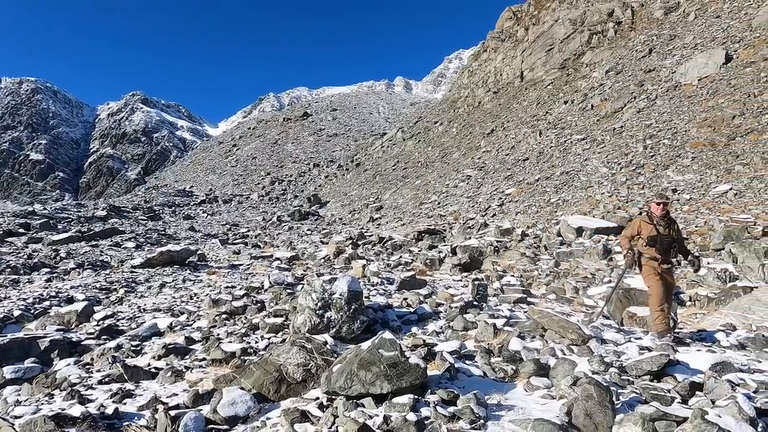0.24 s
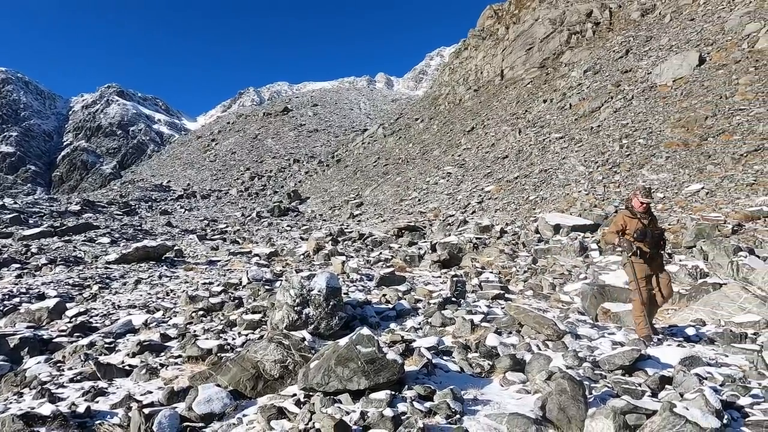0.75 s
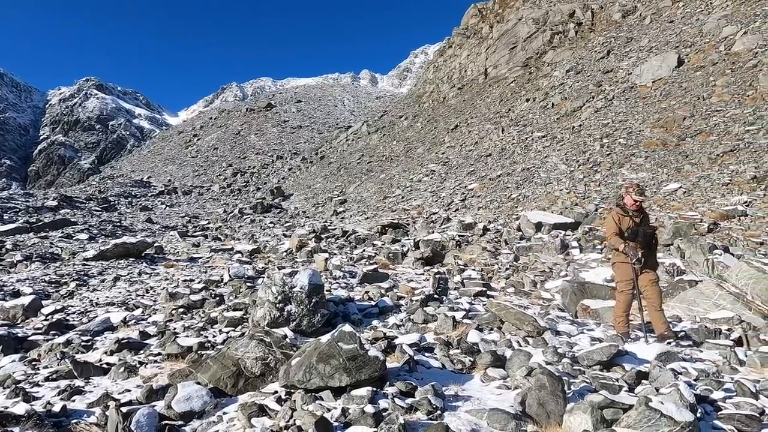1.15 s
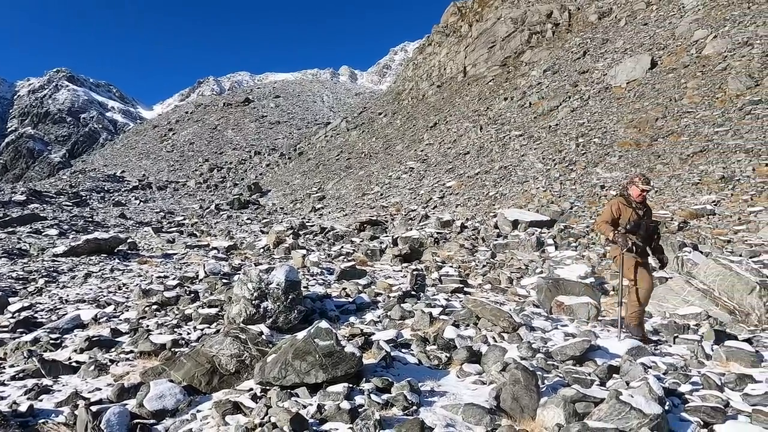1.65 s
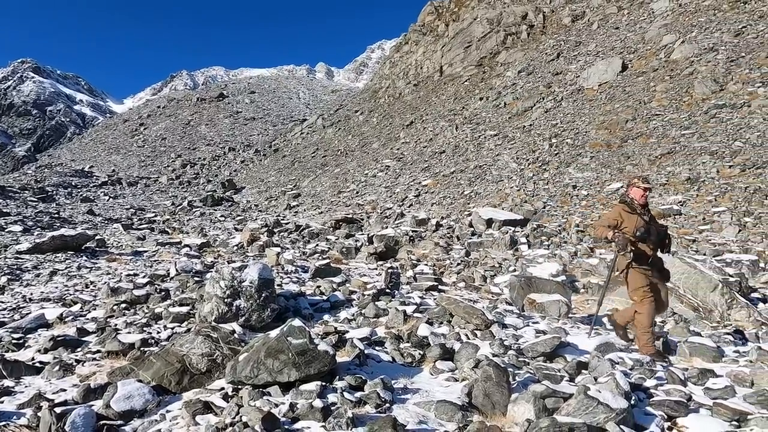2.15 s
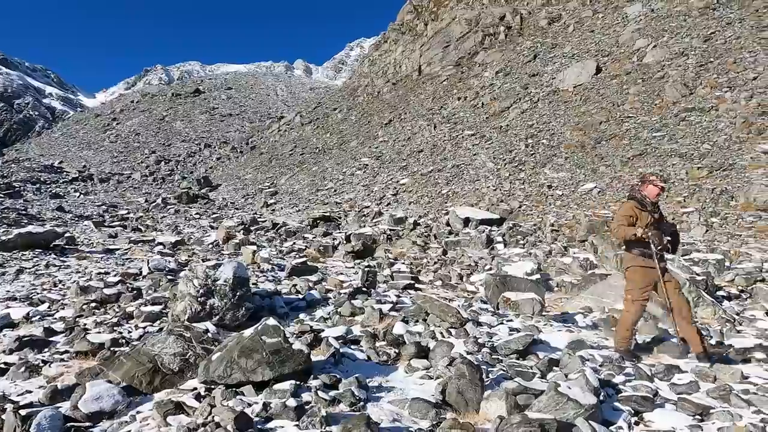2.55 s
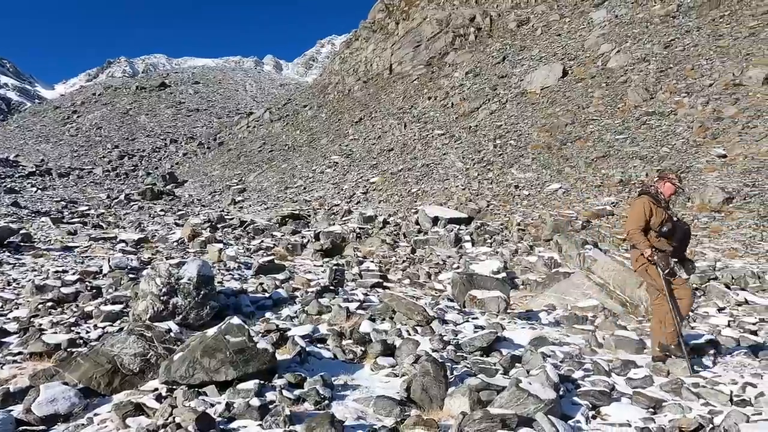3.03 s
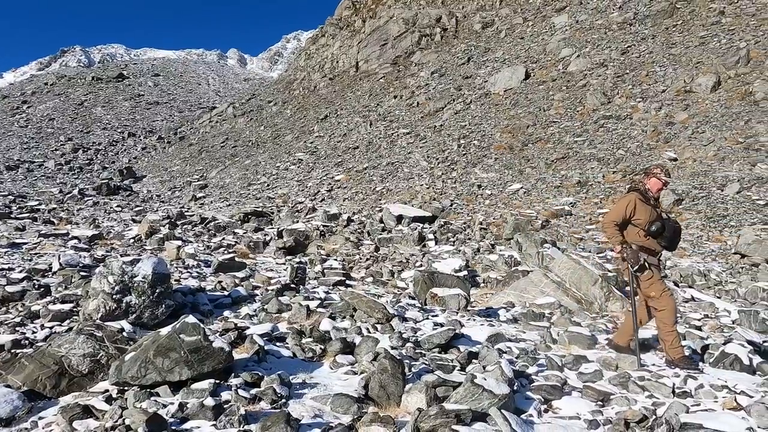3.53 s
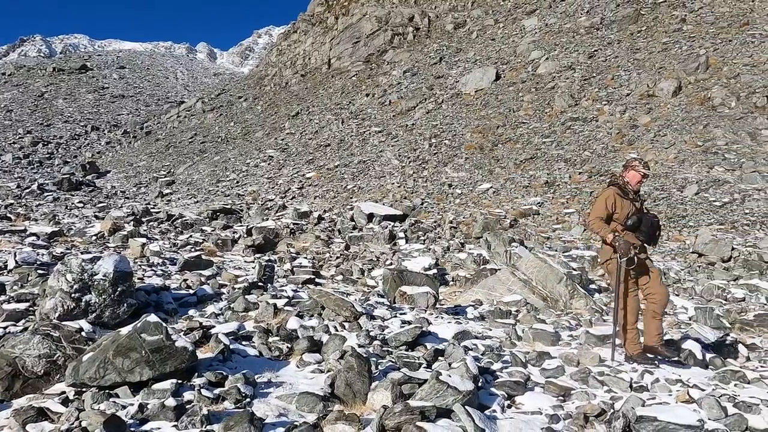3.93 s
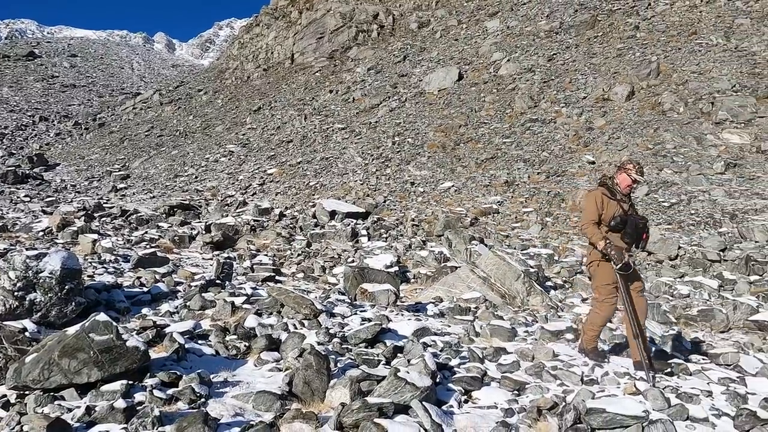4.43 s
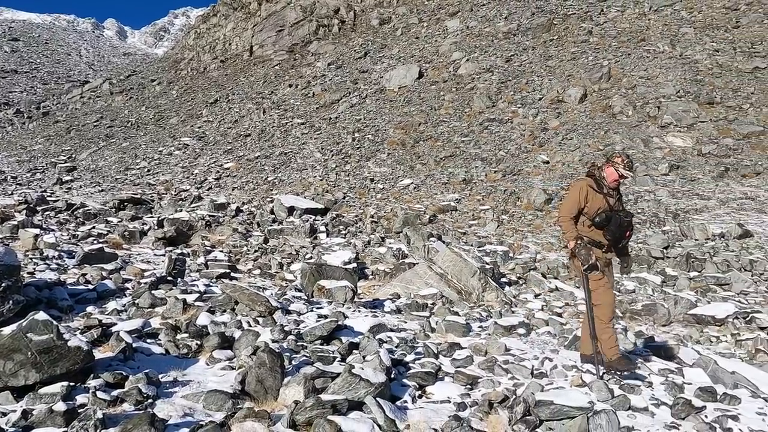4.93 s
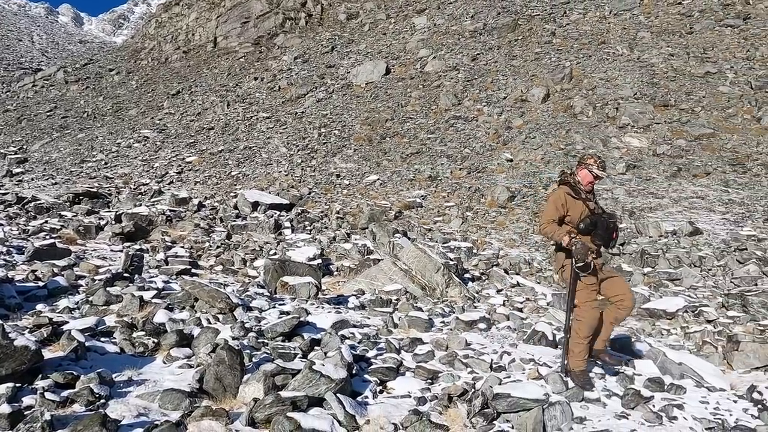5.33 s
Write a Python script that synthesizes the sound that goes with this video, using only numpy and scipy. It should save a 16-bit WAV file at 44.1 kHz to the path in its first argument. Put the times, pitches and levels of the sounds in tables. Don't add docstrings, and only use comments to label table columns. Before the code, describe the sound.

Outdoors on a rocky mountain slope, a hiker some metres away shifts loose stones. A sharp double clack comes first, then a lighter gravelly clatter, a small block-like knock and tiny ticks, and finally a bright ringing slab knock. Quiet gaps hold faint airy hiss, while low wind heaves unevenly against the camera microphone.

```python
import sys
import numpy as np
from scipy import signal
from scipy.fft import rfft, irfft
from scipy.io import wavfile
from scipy.ndimage import uniform_filter1d

SR = 44100
rng = np.random.default_rng(int(sys.argv[2]) if len(sys.argv) > 2 else 0)


def wrap_up_sound(samples):
    columns = np.atleast_2d(samples).T
    tamed = np.clip(columns, -1, 1)
    steps = np.round(tamed * 32767).astype(np.int16)
    wavfile.write(sys.argv[1], SR, steps)


def boost_factor(decibels):
    exponent = np.asarray(decibels, float) / 20
    return 10 ** exponent


N = 246078

# f/Hz, width/Hz, level/dB
SLAB = [(1027, 82, 0.5), (1330, 120, 4.5), (2020, 140, -0.5), (3580, 300, -11), (4020, 280, -11),
        (5720, 340, -16), (6830, 290, -14.5), (8060, 140, -34), (12000, 240, -27), (12900, 290, -33),
        (13700, 280, -24)]
WEDGE = [(1500, 140, -1), (2630, 140, 4.5), (3350, 150, -0.5), (3730, 160, 3), (5200, 210, -5.5),
         (6300, 180, -3.5), (7300, 180, -21), (9850, 440, -25), (12200, 540, -22), (15300, 480, -26)]
SLAB_FACE = [(1250, 77, -1.5), (1590, 88, 6), (2450, 130, 1), (3450, 150, -10), (4500, 77, -21),
             (5530, 120, -8), (6420, 120, -14), (8320, 120, -11), (10000, 140, -26), (13700, 94, -22)]
WEDGE_FACE = [(1290, 60, -2), (1650, 60, 2), (2450, 65, 1), (3740, 71, -1.5), (5220, 70, -10),
              (5300, 60, -12), (6960, 120, -8), (8200, 80, -20), (9600, 52, -28), (11900, 43, -23)]
PLATE_FACE = [(1340, 24, 4), (1580, 75, 0), (1800, 96, -2), (2500, 86, -5), (3340, 90, -5), (5380, 17, -2),
              (6200, 40, -10), (7700, 80, -13), (8400, 90, -11), (13500, 32, -19)]
SHARD = [(1330, 240, -4), (2530, 110, 5), (3980, 280, -4), (6960, 300, -10), (7600, 300, -11),
         (8900, 180, -17), (9900, 170, -11), (11500, 230, -25), (14000, 340, -35)]
SHARD_FOOT = [(1380, 400, 0), (2660, 330, -6), (4820, 200, -16), (6850, 210, -17), (8200, 340, -13),
              (11800, 580, -23)]
GRAVEL = [(670, 200, -8), (1560, 290, -5), (2370, 160, -1), (3320, 130, 0), (3650, 130, -1),
          (4310, 130, -4), (4750, 160, -6), (5320, 70, 7), (6830, 150, -8), (8130, 160, -7.5),
          (8700, 120, -14), (10200, 150, -15), (13700, 200, -26)]
SHARDS = [(1380, 130, 3), (1970, 130, 2), (3400, 150, 4), (3880, 120, 2), (5400, 170, -3), (6940, 220, -7),
          (7300, 120, -7), (8700, 150, -4), (11200, 550, -11), (12300, 110, -15), (14100, 350, -20)]
PEBBLE = [(1635, 260, -12.5), (2920, 65, 1), (3450, 290, -6.5), (4000, 450, -14), (5250, 270, -19),
          (7680, 90, -13.5), (8720, 150, -21), (14900, 500, -37)]
BLOCK = [(417, 150, -4), (910, 100, 1.5), (1570, 98, 0), (2550, 130, -0.5), (3506, 86, 3.5), (3900, 90, -6),
         (5280, 140, -3), (6450, 110, -5), (7150, 150, -7), (7910, 120, -7.5), (8300, 130, -14),
         (11900, 250, -19), (13700, 200, -29)]
CHIP = [(3420, 100, 2), (4040, 350, 0), (5430, 160, -4), (6650, 250, -7), (9900, 300, -13),
        (11600, 280, -16), (14800, 900, -17)]
PLATE = [(900, 150, -3), (1170, 90, 2), (1556, 200, 6), (1780, 97, 4), (2140, 100, 2), (3080, 85, -15),
         (3890, 210, -4), (5000, 89, -10), (6130, 800, -4.5), (7960, 260, -7), (8800, 260, -21),
         (10300, 65, -38), (11900, 79, -33), (13500, 78, -34)]
COBBLE = [(620, 300, -9), (800, 300, -6), (960, 200, -4), (1580, 89, -1), (2380, 290, -4), (3750, 240, -6),
          (4530, 200, -16), (5460, 45, -2), (6270, 150, -7), (7320, 110, -7), (8500, 200, -15),
          (9700, 250, -15.5), (11800, 200, -21), (13700, 300, -24)]
SPLINTER = [(3000, 300, -4), (5800, 300, -6), (9600, 150, 0), (11900, 150, 0), (15200, 250, -8)]
FLAKE = [(1620, 160, 0), (2500, 150, -3), (3620, 160, -3), (5320, 150, -7), (6950, 130, -6),
         (8300, 200, -16), (15400, 120, -20)]


def evened(x):
    return x / np.sqrt(np.mean(x ** 2) + 1e-20)


def read(points, hz):
    f, value = np.transpose(points)
    return np.interp(np.log(hz + 0.045), np.log(f + 0.092), value)


def coloured(x, points):
    gain = boost_factor(read(points, np.fft.rfftfreq(len(x), 1 / SR)))
    return irfft(rfft(x) * gain, len(x))


def add(mix, s, sound):
    part = mix[round(s * SR):][:len(sound)]
    part += sound[:len(part)]


def wash():
    # f/Hz, level/dB per Hz
    valley_colour = [(60, -6), (110, -5), (200, -4.5), (270, -9), (340, -3.5), (480, -5.5), (700, -7.5),
                     (1600, -12.5), (3500, -19), (6300, -22), (8000, -27), (10300, -27.5), (12500, -31),
                     (15600, -39.5)]
    # t/s, level/dB
    swell = [(0, .6), (.9, -2.1), (2.6, -1.7), (4.2, .2), (5.58, 2.6)]
    wash_db = -53.7
    swell_share = [(900, .06), (5000, 0.9), (10000, 1.3)]  # f/Hz, dB per dB of swell
    frames, hz = N // 256 + 5, np.fft.rfftfreq(1024, 1 / SR)
    real, imaginary, patches = rng.standard_normal((frames, 513, 3)).T
    patches = evened(uniform_filter1d(uniform_filter1d(patches, 10, 0), 12, 1))
    air_db = np.interp(np.arange(frames) * 256 / SR, *np.transpose(swell))
    swell_db = read(swell_share, hz)[:, None] * air_db
    z = (real + 1j * imaginary) * boost_factor(read(valley_colour, hz)[:, None] + 0.4 * patches)
    scale = np.sqrt(np.mean(abs(z) ** 2) * len(hz))
    noise = signal.istft(z * boost_factor(swell_db) / scale, nperseg=1024, noverlap=768)[1][:N]
    return boost_factor(wash_db + 6) * noise


def gusts(points, level_db, span):
    x = coloured(rng.standard_normal(N), points)
    local = uniform_filter1d(uniform_filter1d(x ** 2, span), span)
    return x / np.sqrt(local + 0.25 * local.mean()) * boost_factor(level_db)


def wind():
    # middle t/s, half length/s, push level/dB, small eddies/dB against the push
    gust_rows = [(.03, .05, -10, -20), (.12, .04, -20, -6), (.25, .05, -14, -14), (.39, .04, -13, -14),
                 (.56, .05, -12, -20), (.76, .1, -13, -14), (1.03, .04, -26, -9), (1.13, .08, -10, -33),
                 (1.33, .1, -15, -27), (1.6, .08, -23, -29), (2.01, .08, -19, -23), (2.2, .05, -21, -35),
                 (2.37, .06, -31, -12), (2.52, .05, -22, -7), (2.63, .05, -14, -25), (2.73, .04, -25, -2),
                 (2.88, .05, -17, -10), (3.05, .06, -10, -29), (3.26, .04, -18, -19), (3.41, .06, -23, -16),
                 (3.64, .08, -23, -27), (3.9, .07, -19, -18), (4.08, .07, -9, -32), (4.38, .1, -16, -25),
                 (4.55, .06, -10, -25), (4.8, .08, -25, -18), (5.03, .05, -38, -5), (5.28, .1, -26, -18),
                 (5.47, .04, -28, -14)]
    # f/Hz, level/dB per Hz
    heave_colour = [(1, -15.5), (2.5, -8), (4.5, 12), (7, 11), (11, -6), (15, -10.5), (19, -9), (30, -78),
                    (100, -150)]
    buffet_colour = [(12, -54), (18, 1.5), (30, -9.5), (42, -13.5), (60, -42), (300, -130)]
    rumble_colour = [(30, -30), (45, -1.5), (60, -1.5), (90, -10), (150, -21.5), (250, -29.5), (1000, -110)]
    lull_db, lull_eddies_db = -35, -49
    rumble_db, rumble_follows = -54, .55
    pressed_db, pressed_s = -17.5, .04
    t = np.arange(N) / SR
    coarse = t[::64]
    s, half, push_db, eddies_db = np.transpose(gust_rows)[:, :, None]
    shape = np.exp(-((coarse - s) / half) ** 2)
    push = boost_factor(lull_db) + (boost_factor(push_db) * shape).sum(0)
    eddies = boost_factor(lull_eddies_db) + (boost_factor(push_db + eddies_db) * shape).sum(0)
    heave_db = np.interp(t, coarse, 20 * np.log10(push))
    buffet_db = np.interp(t, coarse, 20 * np.log10(eddies))
    heave = gusts(heave_colour, heave_db, span=13001)
    buffet = gusts(buffet_colour, buffet_db, span=4001)
    rumble = gusts(rumble_colour, rumble_db + rumble_follows * (buffet_db + 40), span=2501)
    lean = np.exp(-(t / pressed_s) ** 2)
    return (1 - lean) * (heave + buffet) + rumble + boost_factor(pressed_db) * lean


def thuds():
    # t/s, level/dB
    landings = [(1.259, -49), (2.892, -47), (2.925, -47), (4.579, -52), (4.628, -50)]
    # f/Hz, level/dB per Hz
    puff_colour = [(120, -30), (220, -2), (450, 0), (900, -5), (1600, -30)]
    puff_s = .011
    out, age = np.zeros(N), np.arange(4096) / SR / puff_s
    for s, db in landings:
        puff = evened(coloured(rng.standard_normal(len(age)), puff_colour))
        add(out, s, boost_factor(db) * puff * np.minimum(8 * age, 1) * np.exp(-age))
    return out


def scattered(x):
    # f/Hz, level/dB
    haze_colour = [(500, -6), (2000, 0), (8000, 1), (15000, 3)]
    haze_db, t60_s = -13, .04
    t = np.arange(3000) / SR
    haze = coloured(rng.standard_normal(len(t)), haze_colour)
    haze = haze * boost_factor(-60 * t / t60_s) * np.minimum(t / .002, 1)
    return x + boost_factor(haze_db) * signal.oaconvolve(x, haze / np.linalg.norm(haze))[:N]


def stone(modes, treble_db, crack_db, damping):
    # f/Hz, level/dB
    crack_colour = [(250, 7), (900, 7.5), (2500, 8.5), (5000, 5.5), (9000, -15), (13000, -18), (16000, -17)]
    t = np.arange(2048) / SR
    ring = np.zeros(len(t))
    for hz, width, db in modes:
        grow = 1 - np.exp(-hz * t / 0.28)
        decay = np.exp(-np.pi * damping * max(width, 45) * t)
        ring += boost_factor(db) * width * grow * decay * np.sin(2 * np.pi * hz * t)
    click = 1. * (np.arange(len(t)) == 1024)
    crack = np.roll(coloured(click, crack_colour), 12 - 1024) * (t < .002)
    answer = ring / abs(ring).max() + boost_factor(crack_db) * crack / abs(crack).max()
    low_cut = signal.butter(2, 0.65 * modes[0][0], "high", fs=SR, output="sos")
    answer = signal.sosfilt(low_cut, answer)
    treble = signal.sosfilt(signal.butter(2, 5000, "high", fs=SR, output="sos"), answer)
    return answer + (boost_factor(treble_db) - 1) * treble


def grinds():
    # (start t/s, hardest t/s, end t/s, level/dB)
    slides = [(WEDGE_FACE, (1.262, 1.28, 1.305, -44)), (WEDGE_FACE, (1.305, 1.347, 1.385, -44)),
              (SHARDS, (2.912, 2.945, 2.972, -42)), (BLOCK, (3.396, 3.411, 3.445, -45)),
              (PLATE_FACE, (4.578, 4.582, 4.62, -38)), (PLATE_FACE, (4.61, 4.64, 4.672, -48))]
    from_db, to_db = -10, -18
    out, age = np.zeros(N), np.arange(4400) / SR
    for modes, (start, hardest, end, level_db) in slides:
        grit = rng.standard_normal(len(age)) * boost_factor(1.26 * rng.exponential(1, len(age)))
        grit *= rng.random(len(age)) < 9000 / SR
        load_db = np.interp(start + age, [start, hardest, end], [from_db, 0, to_db])
        grit *= boost_factor(level_db + load_db) / grit.std() * (start + age < end)
        body = stone(modes, treble_db=2.5, crack_db=10, damping=3)
        add(out, start, signal.oaconvolve(grit, body / np.linalg.norm(body)))
    return out


def knocks(stones):
    out, t = np.zeros(N), np.arange(1500) / SR
    for modes, rows in stones:
        for s, blow_db, chatter_db, chatter_ms, treble_db in rows:
            where, size = rng.random(len(t)), rng.laplace(size=len(t))
            age = t / np.clip(chatter_ms / 1000, .0003, .006)
            contacts = size * (where < 5000 / SR)
            contacts = contacts * np.minimum(3 * age, 1) * np.exp(-age)
            rough = stone(modes, treble_db, crack_db=7, damping=2.3)
            chatter = signal.oaconvolve(contacts, rough)
            add(out, s, boost_factor(blow_db) * stone(modes, treble_db, crack_db=-8, damping=1.1))
            add(out, s, boost_factor(chatter_db) * chatter / abs(chatter).max())
    return out


def scene():
    # [(t/s, first blow/dB, chatter peak/dB, chatter time/ms, treble over 5 kHz/dB)]
    first_step = [ (SLAB, [(1.2584, -19, -21, 3.7, -6), (1.2605, -24.5, -30, 2.1, -10)]),
                  (SLAB_FACE, [(1.2655, -36, -27, 3, -3), (1.2712, -32, -30, 2.5, 9),
                  (1.289, -42, -36, 1.6, -6)]), (WEDGE_FACE, [(1.306, -46, -39, 4, -9),
                  (1.324, -44, -40, 2.1, -8), (1.341, -45, -36, 1.4, -5)]),
                  (WEDGE, [(1.3533, -22, -25, .94, .6), (1.3595, -36, -37, 2.5, -9),
                  (1.3737, -38, -42, 1.2, -2)])]
    second_step = [ (GRAVEL, [(2.8905, -35, -31, 2.7, -2), (2.8943, -29, -37, 2.1, -5),
                   (2.897, -38, -33, 2.4, 5)]), (SHARD, [(2.9293, -26.5, -30, 1.05, 1.2),
                   (2.9322, -32, -29, .77, 2.1), (2.952, -37, -43, 1.05, 3), (2.962, -40, -42, .85, -8)]),
                   (SHARD_FOOT, [(2.9232, -35, -31, 2.2, -6), (2.9366, -30, -34, 2.2, -3)]),
                   (SHARDS, [(2.9385, -38, -32, 2.7, 4), (2.944, -33, -38, 2.1, 8)])]
    pole_and_strays = [ (PEBBLE, [(2.9778, -26.5, -39, .77, 6), (4.7116, -35, -46, .6, 4)]),
                       (BLOCK, [(3.398, -46, -45, 2.2, 4), (3.4091, -25.5, -26, 2.1, -2),
                       (3.4165, -42, -38, 1.6, 4)]), (CHIP, [(3.737, -60, -58, 4.5, 6),
                       (4.0105, -35, -41, 1.2, 2.1), (4.0138, -46, -54, 1.05, 0)])]
    last_step = [ (PLATE, [(4.5786, -18, -36, 2.1, -8), (4.581, -24, -27, 1.3, -1),
                 (4.5835, -35, -31, 3.2, 9.5)]), (PLATE_FACE, [(4.5927, -30.5, -30, 1.1, 7.5),
                 (4.600, -39, -38, 1.5, 1.2), (4.606, -32.5, -35, 1.3, 7)]),
                 (COBBLE, [(4.6279, -24.5, -21, 1.4, -5), (4.6325, -30, -29, 2.1, 5),
                 (4.656, -40, -50, 3.4, -4)])]
    settling = [ (FLAKE, [(1.268, -38, -36, 2, 3), (1.276, -38, -36, 2.5, 3), (1.282, -46, -42, 2, 0),
                (1.3095, -44, -44, 2, -10), (1.313, -42, -42, 1.5, 3), (1.322, -46, -44, 2, 6),
                (1.331, -44, -42, 2, 3), (1.337, -42, -40, 2, 0), (1.347, -40, -40, 2, -3)]),
                (GRAVEL, [(2.901, -42, -38, 2, 4), (2.907, -48, -44, 3, -3), (2.9475, -42, -40, 1.5, 3),
                (2.9555, -46, -42, 1.5, 3), (2.981, -44, -42, 2, 0)]), (GRAVEL, [(3.403, -46, -42, 2, -4),
                (3.4125, -40, -38, 2.5, 3), (3.420, -46, -42, 2.5, 0), (3.434, -50, -46, 2.5, -4)]),
                (SPLINTER, [(3.399, -50, -50, 1.5, 0), (3.7375, -50, -52, 2.5, 0),
                (4.008, -52, -52, 1.2, 0)]), (FLAKE, [(4.0135, -44, -52, 1, -10), (4.587, -42, -38, 1.5, 3),
                (4.590, -42, -40, 1.2, 3), (4.6035, -44, -42, 1.2, 0), (4.618, -46, -44, 2, 2)]),
                (COBBLE, [(4.6355, -38, -36, 2, 2), (4.640, -46, -43, 3, 0)])]
    steps = knocks(first_step + second_step + pole_and_strays + last_step) + grinds()
    air = wind() + wash() + thuds()
    return (air + scattered(steps + knocks(settling)))[None]


def top_cut(x):
    return signal.sosfilt(signal.butter(12, 15750, fs=SR, output="sos"), x)


def record(dry):
    edge_hz = 15750
    held = np.pad(dry, ((0, 0), (255, 255)), "edge")
    low_pass = signal.firwin(511, edge_hz, window=("kaiser", 9), fs=SR)
    limited = signal.oaconvolve(held, low_pass[None], "valid")
    return top_cut(limited)


dry = scene()
out = record(dry)
wrap_up_sound(out)
```